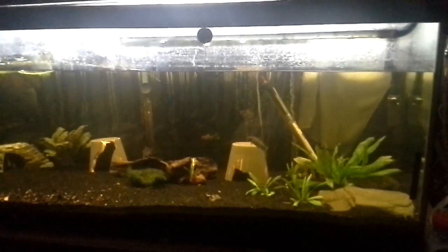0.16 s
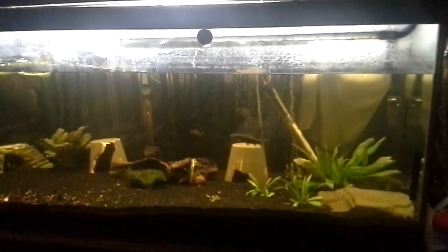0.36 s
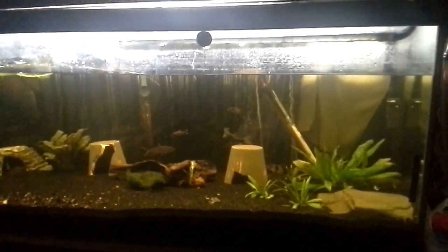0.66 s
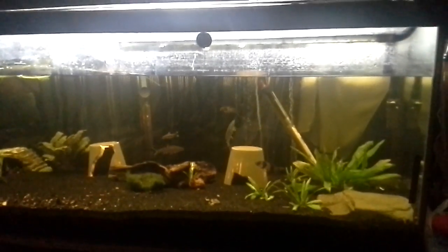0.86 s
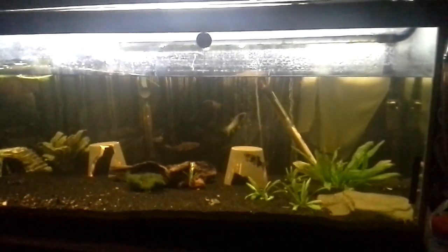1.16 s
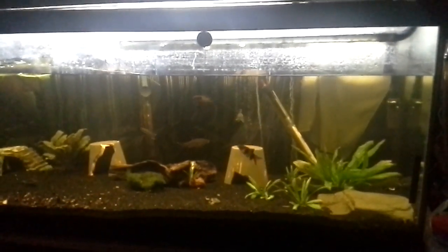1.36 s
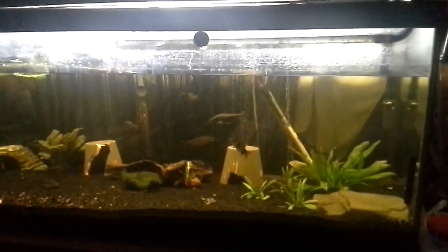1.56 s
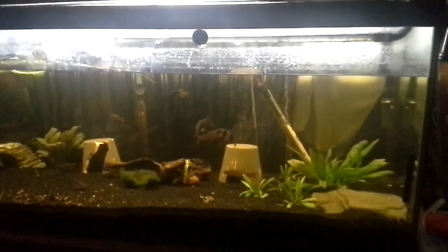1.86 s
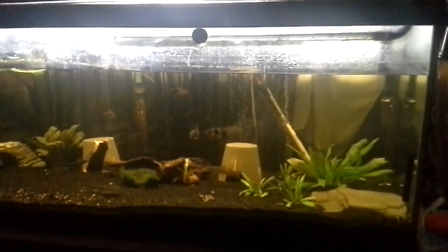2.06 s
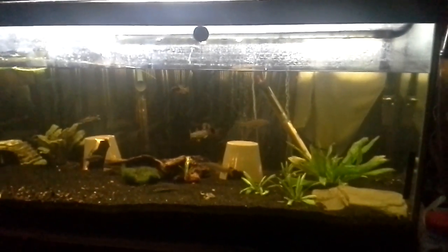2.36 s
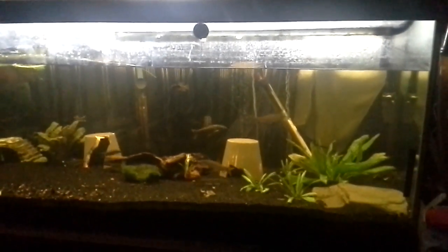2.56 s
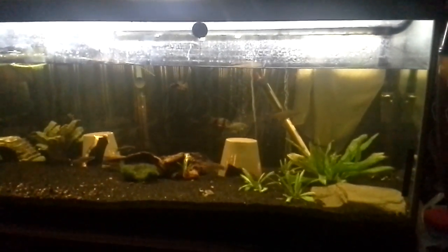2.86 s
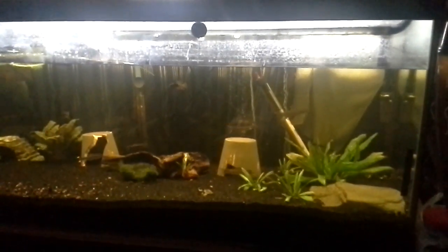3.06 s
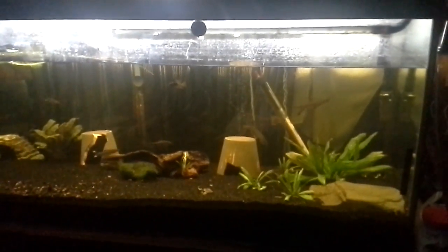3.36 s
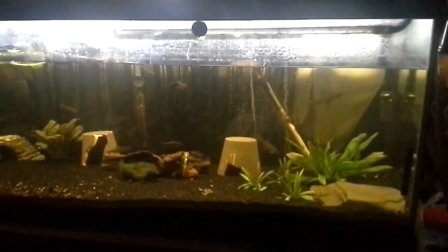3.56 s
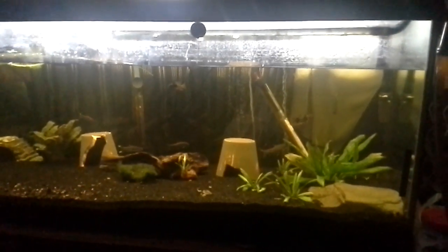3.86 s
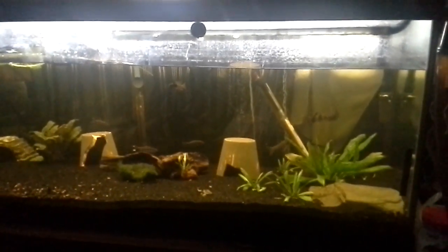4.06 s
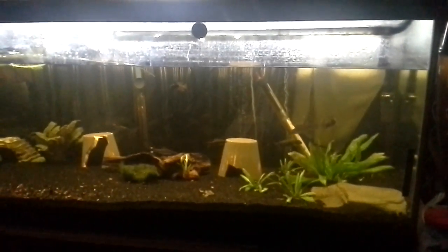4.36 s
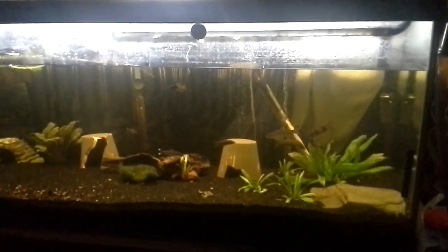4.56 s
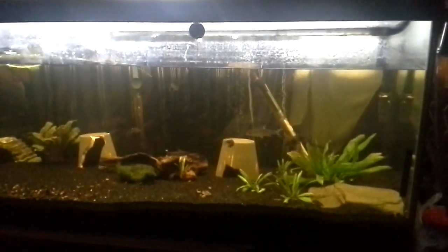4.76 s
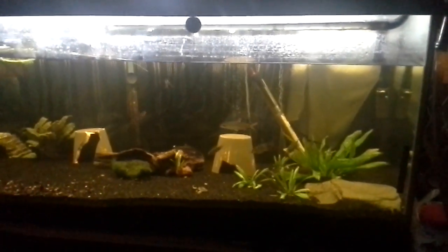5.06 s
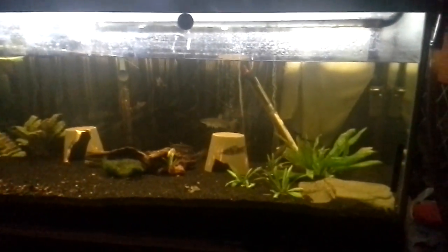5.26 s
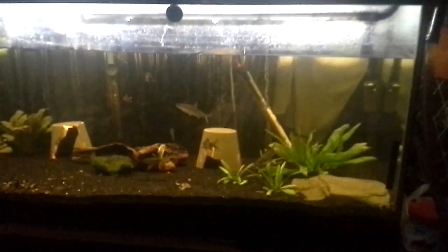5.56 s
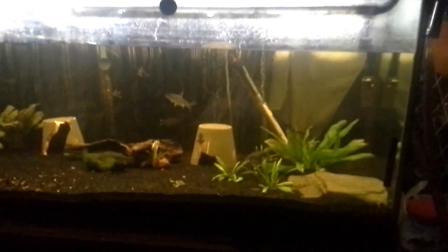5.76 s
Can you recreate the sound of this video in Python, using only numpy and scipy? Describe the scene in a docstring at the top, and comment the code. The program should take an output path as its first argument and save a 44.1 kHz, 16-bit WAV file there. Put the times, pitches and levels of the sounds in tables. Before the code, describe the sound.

Water trickles and bubbles steadily into a home aquarium, with small splashes, a fine hiss and a faint pump hum.

```python
"""Trickling aquarium filter

Water from a filter outlet falls into a home aquarium. Bubbles ring in the air under the hood, splashes burst, a
fine spray hisses, and the pump hums near multiples of the mains frequency. A small microphone with a treble
peak listens; its level dips briefly and often."""
import sys
import numpy as np
from scipy import signal
from scipy.fft import rfft, irfft, next_fast_len
from scipy.io import wavfile
from scipy.ndimage import uniform_filter1d, map_coordinates

SR = 44100
rng = np.random.default_rng(int(sys.argv[2]) if len(sys.argv) > 2 else 0)


def store_wav(level_fs):
    """Save 16-bit WAV to argv[1]."""
    pcm = np.round(np.clip(np.atleast_2d(level_fs), -1, 1) * 32767)
    wavfile.write(sys.argv[1], SR, pcm.T.astype(np.int16))


N = 260631

# moments when the spray spits: t/s, level/dB
SPRAY_SPITS = [(0.1266, -32.5), (0.649, -39), (1.3263, -42), (1.473, -40), (1.524, -37.5), (1.601, -34),
               (1.7596, -36.5), (2.666, -39), (2.687, -32), (3.113, -36.5), (3.716, -33), (3.97, -39.5),
               (4.4736, -31.5), (4.9336, -31.5), (5.343, -35), (5.801, -38)]


def trickle(level_db, treble_db):
    """The falling stream: a crowd of bubbles over a wash of noise, both ringing under the hood."""
    # tone colour of the water: f/Hz, level/dB
    water_colour = [(150, -73), (300, -7), (550, -5), (1000, -5.5), (2000, -10.5), (3500, -13.5),
                    (4800, -22), (5300, -24), (5900, -50), (8000, -69)]
    crowd = swarm(count=1400, low_hz=501.4, high_hz=5510, life_s=0.029,
                  spread_db=0.8, rough=0.0892, samples=900)
    crowd = echoes(crowd, fade_s=0.11, echo_db=2.0)
    stream = amp(-4) * unit(crowd) + patchy_noise(patchy_db=1.5, bands=8)
    body = unit(filtered(stream, lambda f: colour_gain(water_colour, f) * hood(f)))
    bass = filtered(body, lambda f: 1 / (1 + (f / 1850) ** 8))
    tilted = amp(-0.4 * treble_db) * bass + amp(0.34 * treble_db) * (body - bass)
    return amp(level_db - 1.54 + 3.56 * wobble(20.796)) * tilted


def bubbles():
    """Single clear plops: trapped air rings for a moment and echoes under the hood."""
    # the clearest bubbles: t/s, f/Hz, level/dB
    clear_bubbles = [(0.09, 3650, -38), (0.117, 1083, -36.5), (0.195, 927, -37), (0.255, 886, -44),
                     (0.33, 1310, -40.5), (0.365, 631, -42.5), (0.43, 1715, -34.5), (0.457, 3380, -38.5),
                     (0.528, 3840, -40.5), (0.704, 513, -38.5), (0.717, 2500, -40), (0.735, 537, -40),
                     (0.785, 956, -38), (0.802, 853, -35), (0.826, 867, -33.5), (0.855, 875, -45),
                     (0.936, 1273, -33), (0.955, 1270, -33.5), (0.966, 2310, -33.5), (1.026, 2310, -45),
                     (1.06, 861, -35), (1.07, 1207, -35.5), (1.072, 1890, -37), (1.149, 736, -38),
                     (1.168, 720, -55), (1.205, 1260, -34), (1.232, 873, -29.5), (1.273, 2576, -34.5),
                     (1.282, 850, -34.5), (1.357, 1813, -32.5), (1.502, 896, -45), (1.525, 864, -34.5),
                     (1.595, 1153, -38.5), (1.597, 491, -41.5), (1.654, 3020, -46), (1.67, 1730, -41),
                     (1.72, 927, -38), (1.809, 897, -41), (1.831, 1332, -34), (1.853, 997, -31.5),
                     (2.054, 1251, -32), (2.057, 3440, -39), (2.162, 2080, -36.5), (2.181, 3230, -36.5),
                     (2.189, 4540, -40), (2.225, 1020, -40), (2.25, 970, -32.5), (2.249, 3280, -28.5),
                     (2.25, 3864, -30.5), (2.315, 868, -40), (2.386, 884, -40), (2.591, 668, -37),
                     (2.591, 3310, -45), (2.625, 944, -38), (2.707, 1623, -31), (2.751, 784, -40),
                     (2.801, 1540, -33), (2.868, 1650, -39.5), (2.899, 3050, -36.5), (2.949, 1009, -35),
                     (3.014, 2510, -33.5), (3.054, 2310, -39), (3.082, 914, -37.5), (3.1, 896, -36.5),
                     (3.121, 1784, -38), (3.21, 1645, -39.5), (3.232, 1146, -32), (3.299, 1026, -31.5),
                     (3.312, 2420, -41.5), (3.325, 974, -44), (3.442, 834, -34.5), (3.4, 1706, -40.5),
                     (3.473, 3400, -40), (3.49, 855, -34), (3.568, 2550, -34.5), (3.64, 2290, -36),
                     (3.762, 836, -29.5), (3.792, 4013, -33.5), (3.795, 854, -33.5), (3.9, 1605, -33),
                     (3.978, 2212, -38), (3.98, 1522, -38), (4.008, 518, -44.5), (4.021, 1250, -42),
                     (4.093, 3255, -27.5), (4.148, 946, -36.5), (4.152, 2954, -28.5), (4.174, 2120, -34),
                     (4.338, 1343, -34), (4.391, 3670, -34), (4.514, 1610, -32.5), (4.515, 1357, -36.5),
                     (4.58, 860, -37), (4.623, 936, -36), (4.659, 990, -39), (4.71, 908, -50),
                     (4.74, 964, -39.5), (4.78, 1070, -40.5), (4.914, 3325, -33), (5.09, 1000, -33.5),
                     (5.137, 1660, -38.5), (5.204, 940, -41), (5.368, 630, -38.5), (5.378, 1030, -29),
                     (5.391, 2816, -36), (5.443, 3345, -36.5), (5.537, 1400, -38), (5.581, 1687, -35.5),
                     (5.625, 870, -34), (5.692, 887, -28), (5.713, 1550, -37), (5.731, 2484, -35.5)]
    start_s, hz, db = np.transpose(clear_bubbles)
    fall_s = 0.023 * (1000 / hz) ** 0.63  # small, high bubbles die sooner
    db = db - 2.5 - 20 * np.log10(hood(hz))  # offsets the hood's boost at each pitch
    plops = ringing(start_s, hz, db, fall_s, rise=0.26, hold=1.46,
                    rough=0.0448, spread_hz=33.2, samples=4000)
    return filtered(echoes(plops, fade_s=0.44, echo_db=-5.0), hood)


def splashes():
    """Each splash is a burst of noise around its own pitch: it starts fast, holds and breaks off."""
    # wet splashes: t/s, level/dB, centre f/Hz, spread/octaves
    wet_splashes = [(0.091, -44.5, 3500, 0.24), (0.201, -53.5, 4640, 0.3), (0.5888, -44.5, 2530, 0.31),
                    (0.756, -54, 5000, 0.051), (0.9333, -45, 2690, 0.29), (0.976, -44, 2350, 0.15),
                    (1.031, -48, 2350, 0.15), (1.0676, -51, 4050, 0.054), (1.274, -46.5, 2650, 0.32),
                    (1.5377, -48.5, 4360, 0.083), (1.5893, -52.5, 4270, 0.12), (1.987, -50, 2480, 0.4),
                    (2.054, -56, 3560, 0.28), (2.313, -45.5, 3860, 0.27), (2.434, -52.5, 3740, 0.19),
                    (2.583, -43, 3420, 0.25), (2.656, -47.5, 4900, 0.56), (2.862, -49, 3080, 0.59),
                    (3.067, -47, 4280, 0.63), (3.151, -43.5, 2370, 0.32), (3.1895, -48.5, 4400, 0.14),
                    (3.268, -49, 4060, 0.063), (3.341, -51, 4870, 0.053), (3.397, -45.5, 3800, 0.28),
                    (3.52, -48, 3380, 0.18), (3.5726, -54, 2660, 0.15), (3.605, -46, 2600, 0.16),
                    (3.7917, -44.5, 3900, 0.099), (4.091, -43, 3660, 0.35), (4.387, -44.5, 3820, 0.19),
                    (4.469, -43.5, 3130, 0.64), (4.597, -48, 3660, 0.17), (4.75, -53, 4320, 0.18),
                    (4.858, -46, 3080, 0.13), (4.922, -49.5, 4500, .15), (5.3194, -49, 3000, 0.12),
                    (5.359, -42, 2750, 0.095), (5.551, -55, 4140, 0.082), (5.694, -50.5, 4340, 0.23),
                    (5.7976, -49.5, 4900, 0.09)]
    rise_s, hold_s, top_hz = 0.0038, 0.032, 5630
    start_s, db, hz, octaves = np.transpose(wet_splashes)[:, :, None]
    t = np.arange(4096) / SR
    f = np.fft.rfftfreq(len(t), 1 / SR) + 1
    colour = np.exp(-0.5 * (np.log2(f / hz) / octaves) ** 2) / (1 + (f / top_hz) ** 16)
    noise = irfft(rfft(rng.standard_normal((len(start_s), len(t)))) * colour)
    noise /= noise.std(axis=1, keepdims=True)
    loudness = amp(db - 6.3 * (t / hold_s) ** 2) * -np.expm1(-t / rise_s)
    return place(loudness * noise, start_s)


def spray(level_db):
    """Tiny droplets burst over a fine hiss, which swells a little around each spit."""
    # tone colour of the spray, with its treble peak: f/Hz, level/dB
    spray_colour = [(4000, -26), (6600, -15.5), (7300, -3.5), (8200, 5), (9500, -4.5), (10400, -12.5),
                    (15500, -19)]
    surge_db, surge_s, strong_spit_db = 0.5, 0.12, -38.5
    t = np.arange(N) / SR
    for spit_s, db in SPRAY_SPITS:
        strength = min(amp(db - strong_spit_db), 1)
        level_db = level_db + surge_db * strength * np.exp(-((t - spit_s) / surge_s) ** 2)
    drops = swarm(count=1500, low_hz=6474, high_hz=10064, life_s=0.015,
                  spread_db=0.6, rough=0.0426, samples=500)
    drops = echoes(drops, fade_s=0.055, echo_db=8.5)
    mist = amp(-8) * unit(drops) + patchy_noise(patchy_db=1.0, bands=10)
    hiss = unit(filtered(mist, lambda f: colour_gain(spray_colour, f)))
    spits = filtered(spits_and_clicks(), lambda f: colour_gain(spray_colour, f) / (1 + (f / 14000) ** 4))
    return amp(level_db - 1.03 + 1.7 * wobble(14)) * hiss + spits


def spits_and_clicks():
    """Short puffs of noise: the spray spits with a soft tail, and single droplets click."""
    # dry droplet clicks: t/s, level/dB
    clicks = [(1.4105, -26), (3.966, -28), (5.249, -22), (5.3199, -33)]
    sound = np.zeros(N + SR)
    t = np.arange(SR // 20) / SR
    rise = -np.expm1(-t / 0.0026)
    for start_s, db in SPRAY_SPITS:
        fade = amp(db + 1.5 - 60 * t / 0.042) + amp(db - 6.5 - 60 * t / 0.32)
        sound[round(start_s * SR):][:len(t)] += rise * fade * rng.standard_normal(len(t))
    for start_s, db in clicks:
        sound[round(start_s * SR):][:len(t)] += amp(db - 60 * t / 0.016) * rng.standard_normal(len(t))
    return sound[:N]


def pump(level_db, buzz_db):
    """The pump hums in wavering mains tones over a low rumble; a 240 Hz buzz swells on its own."""
    # hum tones: f/Hz, relative level/dB, wavering/dB
    hum_tones = [(57.9, -13, 11.5), (119.8, -7, 3), (355, -9, 1.5)]
    # tone colour of the rumble: f/Hz, level/dB
    rumble_colour = [(15, 7), (30, 2.5), (78, 0.5), (100, -9.5), (180, 1), (450, -0.5), (900, -26)]
    phase_per_hz = 2 * np.pi * np.arange(N) / SR
    hum = sum(amp(db + waver_db * wobble(4.6)) * np.sin(hz * phase_per_hz + 1.17 * wobble(6.3))
              for hz, db, waver_db in hum_tones)
    noise = patchy_noise(patchy_db=4.0, bands=2)
    rumble = unit(filtered(noise, lambda f: colour_gain(rumble_colour, f)))
    buzz = amp(buzz_db + 2.5 + 4.1 * wobble(20)) * np.sin(240 * phase_per_hz + 1.28 * wobble(16))
    return amp(level_db) * (hum + amp(1.5) * rumble) + buzz


def hood(f):
    """Gain of the air under the hood: it boosts the pitches at which it likes to ring."""
    # ringing pitches of the air space: f/Hz, width/Hz, strength/dB
    resonances = [(859, 29.6, 11), (999, 31, 8.5), (1257, 60, 5.5), (1611, 63, 7), (2023, 34, 4),
                  (2430, 92, 0.5), (2964, 40, 6)]
    boost = sum(amp(2 * db) / (1 + (2 * (f - hz) / width) ** 2) for hz, width, db in resonances)
    return np.sqrt(1 + boost)


def swarm(count, low_hz, high_hz, life_s, spread_db, rough, samples):
    """Many small bubbles at random moments, some a bit louder; the high ones die sooner."""
    when, pitch, life, strength = rng.random((count, 4)).T
    hz = low_hz * (high_hz / low_hz) ** pitch
    db = -spread_db * np.log(1 - 0.93 * strength)
    db += 11 * np.log10(hz / low_hz)  # keeps high and low pitches about even
    fall_s = life_s * (0.5 + life) * np.sqrt(low_hz / hz)
    return unit(ringing(when * N / SR, hz, db, fall_s, rise=0.21, hold=1.9,
                        rough=rough, spread_hz=14, samples=samples))


def ringing(start_s, hz, db, fall_s, rise, hold, rough, spread_hz, samples):
    """Bubble tones that swell, hold and die; three nearby pitches beat with each and roughen it."""
    t = np.arange(samples) / SR
    age = t / fall_s[:, None]
    tone = np.sin(2 * np.pi * hz[:, None] * t)
    for offset, phase in rng.standard_normal((len(hz), 3, 2)).transpose(1, 2, 0):
        nearby_hz = hz + (rough * hz + spread_hz) * offset
        tone += 0.62 * np.sin(2 * np.pi * nearby_hz[:, None] * t + np.pi * phase[:, None])
    loudness = amp(db[:, None] - 10 * age ** hold) * -np.expm1(-age / rise)
    soft_end = np.cos(np.pi / 2 * t / t[-1])
    return place(loudness * tone * soft_end, start_s)


def echoes(x, fade_s, echo_db):
    """Glass and moving water bounce each sound about, differently every quarter second."""
    step = SR // 4
    t = np.arange(SR // 8) / SR
    pieces = np.pad(x, (0, -N % step)).reshape(-1, step)
    tails = rng.standard_normal((len(pieces), len(t))) * amp(-60 * t / fade_s)
    tails /= np.linalg.norm(tails, axis=1, keepdims=True)
    bounced = signal.fftconvolve(pieces, tails, axes=1)
    return x + amp(echo_db) * place(bounced, np.arange(len(pieces)) * step / SR)


def patchy_noise(patchy_db, bands):
    """Noise with louder and softer patches in time and pitch; a patch spans `bands` steps of 86 Hz."""
    spectrum = signal.stft(rng.standard_normal(N), nperseg=512)[2]
    patches = uniform_filter1d(rng.standard_normal(spectrum.shape), size=bands, axis=0)
    patches = unit(uniform_filter1d(patches, size=7, axis=1))
    return unit(signal.istft(spectrum * amp(patchy_db * patches), nperseg=512)[1][:N])


def wobble(rate):
    """A smooth curve through `rate` random values a second."""
    coarse = np.arange(0, N + 64, 64)
    curve = map_coordinates(rng.standard_normal(400), [coarse * rate / SR])
    return np.interp(np.arange(N), coarse, curve)


def place(sounds, start_s):
    """Adds short sounds, one per row, into a single track at their start times."""
    at = np.round(start_s * SR).astype(int).reshape(-1, 1) + np.arange(sounds.shape[1])
    return np.bincount(at.ravel(), sounds.ravel(), N)[:N]


def filtered(x, response):
    """Turns each frequency f in x up or down by response(f)."""
    size = next_fast_len(N + SR // 2)
    return irfft(rfft(x, size) * response(np.fft.rfftfreq(size, 1 / SR)), size)[:N]


def colour_gain(points, f):
    """Gain at f on a line through (f/Hz, level/dB) points, spaced by pitch."""
    hz, db = np.transpose(points)
    return amp(np.interp(np.log(f + 1), np.log(hz + 1), db))


def curves(rows):
    """One value per sample for each column after the time."""
    times, *columns = np.transpose(rows)
    return [np.interp(np.arange(N) / SR, times, column) for column in columns]


def amp(db):
    """Turns a level in dB into a gain."""
    return 10 ** (np.asarray(db) / 20)


def unit(x):
    """Scales x to an average power of 1."""
    return x / np.sqrt(np.mean(x ** 2) + 1e-20)


def scene():
    """Water and pump sound together in one channel."""
    # the changing flow: t/s, trickle level/dB, tilt towards treble/dB, spray level/dB
    flow = [(0.1, -40.5, 3, -53), (0.3, -48, 0, -55), (0.55, -47.5, 7.5, -64.5), (0.84, -42.5, 6, -57),
            (1.0, -45, 6.5, -50.5), (1.3, -45.5, 0.5, -59.5), (1.6, -46, 6.5, -59.5),
            (1.85, -45.5, -1, -54), (2.1, -44, 5, -59.5), (2.5, -46.5, 9, -55.5), (2.8, -43.5, 9, -55),
            (3.2, -46.5, 5, -56), (3.59, -45.5, 15, -57.5), (3.88, -44.5, 3.5, -55.5), (4.4, -44, 11, -55),
            (4.68, -47.5, -3.5, -54.5), (5.0, -45, 0, -54.5), (5.6, -42, -1, -55.5),
            (5.91, -48, -2.5, -58.5)]
    # the changing pump: t/s, hum and rumble level/dB, buzz level/dB
    pump_levels = [(0.11, -55, -60.5), (0.26, -57, -50.5), (0.42, -57.5, -72), (0.69, -56, -53),
                   (0.9, -53, -65), (1.42, -59, -59), (1.68, -59.5, -62), (2.2, -56, -65.5),
                   (2.55, -55.5, -59.5), (2.87, -58, -50), (3.03, -54.5, -66), (3.88, -57.5, -66),
                   (4.17, -54.5, -53.5), (4.32, -54, -55), (4.55, -55.5, -57), (4.95, -56.5, -57.5),
                   (5.33, -55, -55.5), (5.62, -56, -54.5), (5.91, -59, -66)]
    water_db, treble_db, spray_db = curves(flow)
    water = trickle(water_db, treble_db) + bubbles() + splashes() + spray(spray_db)
    return (water + pump(*curves(pump_levels)))[None]


def record(dry):
    """The microphone: after a short silence its level sinks and snaps back again and again."""
    # brief drops in level: lowest point t/s, depth before scaling/dB, length/s
    dips = [(0.079, -9.5, 0.023), (0.173, -7, 0.04), (0.247, -16.5, 0.034), (0.31, -6.5, 0.026),
            (0.358, -13.5, 0.018), (0.391, -16.5, 0.025), (0.425, -4, 0.031), (0.52, -13.5, 0.02),
            (0.575, -10.5, 0.039), (0.636, -17, 0.022), (0.917, -17.5, 0.045), (1.417, -15.5, 0.037),
            (1.569, -9, 0.0085), (1.65, -9.5, 0.019), (1.796, -7, 0.047), (1.931, -25, 0.027),
            (1.974, -18, 0.026), (2.149, -5, 0.014), (2.215, -8, 0.016), (2.31, -14.5, 0.024),
            (2.382, -20, 0.036), (2.42, -11.5, 0.033), (2.527, -10, 0.016), (2.567, -5.5, 0.068),
            (2.746, -9, 0.02), (2.856, -15, 0.045), (2.98, -7.5, 0.017), (3.308, -8, 0.036),
            (3.375, -8.5, 0.014), (3.565, -13, 0.013), (3.688, -12.5, 0.017), (3.764, -7, 0.03),
            (3.857, -9.5, 0.023), (3.938, -6.5, 0.027), (3.971, -5, 0.024), (4.075, -13, 0.038),
            (4.283, -11.5, 0.045), (4.331, -14, 0.036), (4.374, -10.5, 0.039), (4.454, -10, 0.019),
            (4.565, -6, 0.007), (4.706, -11, 0.028), (4.889, -6.5, 0.031), (5.036, -43, 0.057),
            (5.078, -13.5, 0.035), (5.192, -11, 0.034), (5.246, -12, 0.0037), (5.294, -16.5, 0.068),
            (5.581, -12.5, 0.032), (5.674, -8.5, 0.035), (5.854, -15, 0.033)]
    start_s, treble_from_hz, top_hz = 0.069, 2100, 15800
    sinking_share = 0.74  # of a dip's length; the rest is the quicker return
    t = np.arange(0, N / SR, 1 / 2000)
    dip_db = 0
    for lowest_s, depth_db, length_s in dips:
        distance = np.abs(t - lowest_s) / length_s
        sinking = np.exp(-0.95 * (distance / sinking_share) ** 3.1)
        returning = np.exp(-0.95 * (distance / (1 - sinking_share)) ** 3.4)
        dip_db = dip_db + depth_db * np.where(t < lowest_s, sinking, returning)
    fade_in_db = np.clip((t - start_s) * 2500 - 12, -90, 0)
    gain = lambda share: amp(np.interp(np.arange(N) / SR, t, fade_in_db + share * dip_db))
    bass = filtered(dry[0], lambda f: 1 / (1 + (f / treble_from_hz) ** 12))
    heard = bass * gain(0.97) + (dry[0] - bass) * gain(0.78)  # the treble sinks less deeply
    return filtered(heard, lambda f: f < top_hz)[None]


dry = scene()
out = record(dry)
store_wav(out)
```